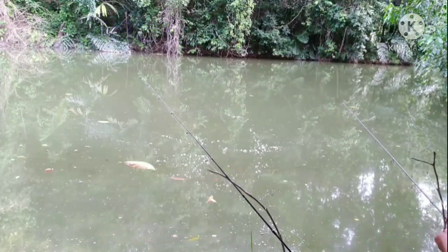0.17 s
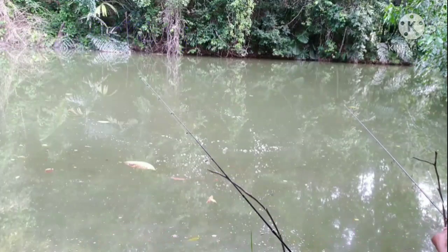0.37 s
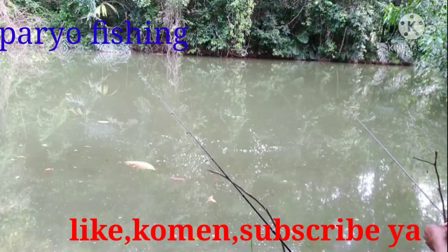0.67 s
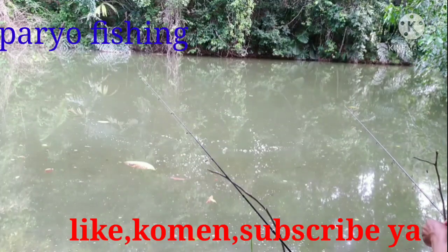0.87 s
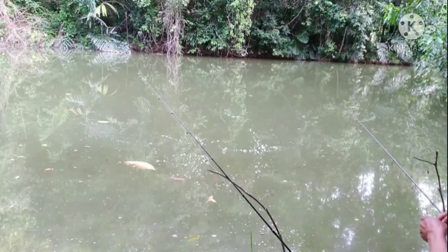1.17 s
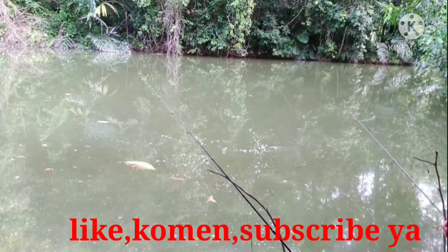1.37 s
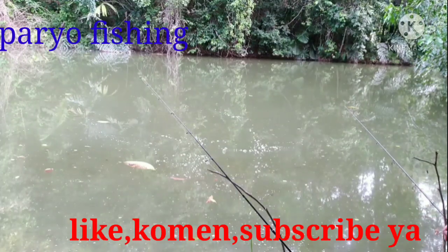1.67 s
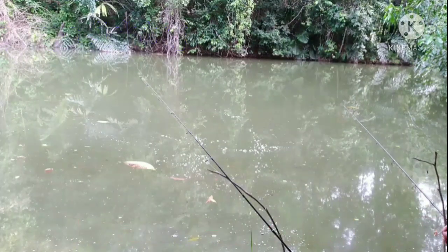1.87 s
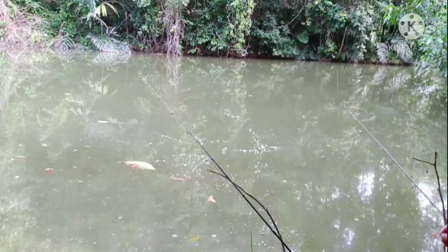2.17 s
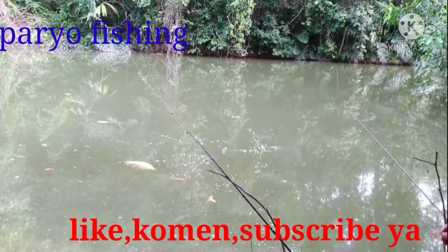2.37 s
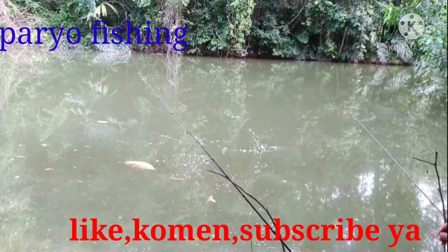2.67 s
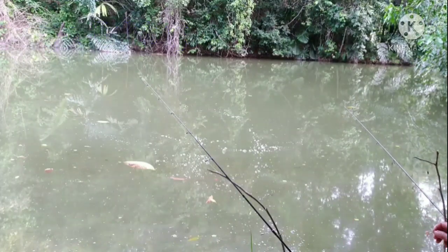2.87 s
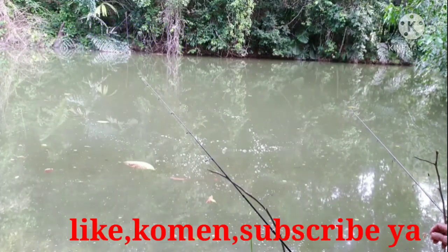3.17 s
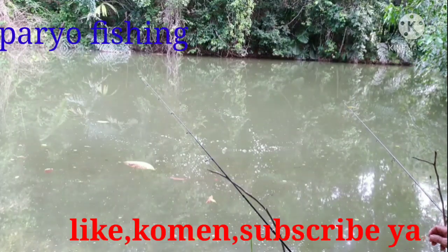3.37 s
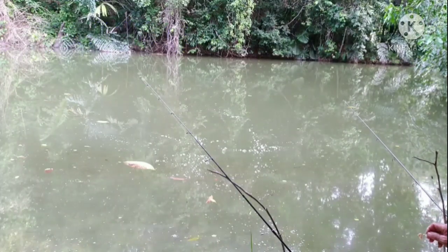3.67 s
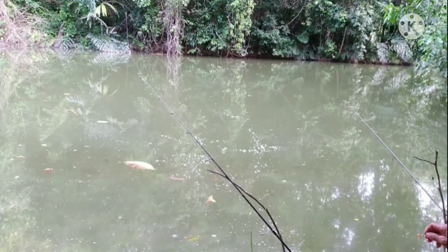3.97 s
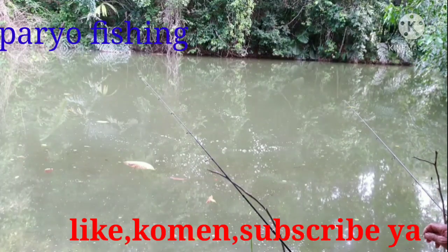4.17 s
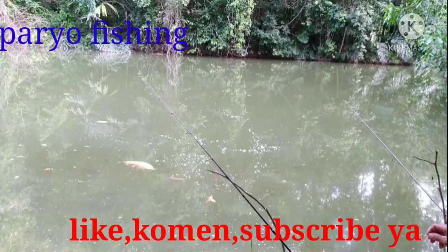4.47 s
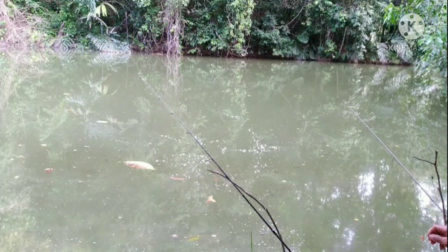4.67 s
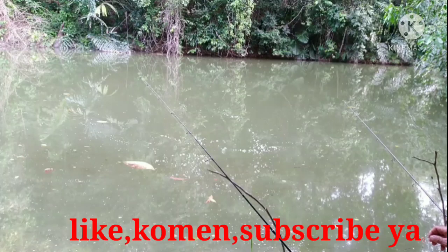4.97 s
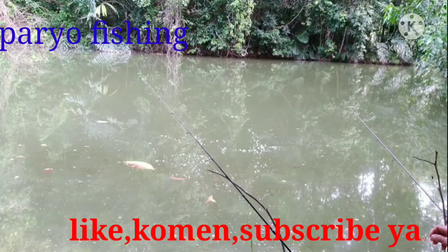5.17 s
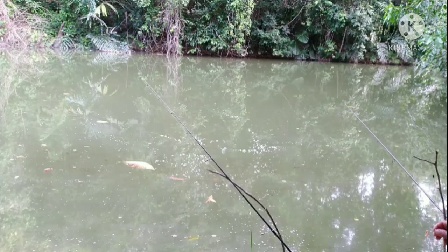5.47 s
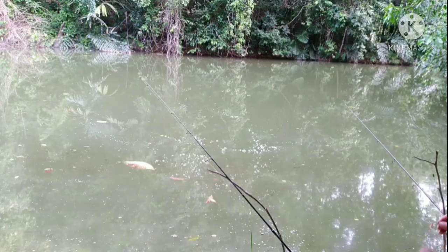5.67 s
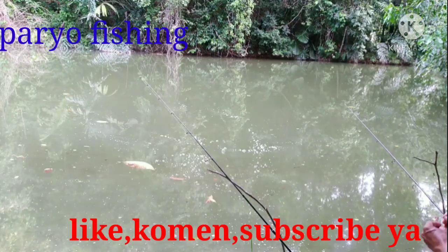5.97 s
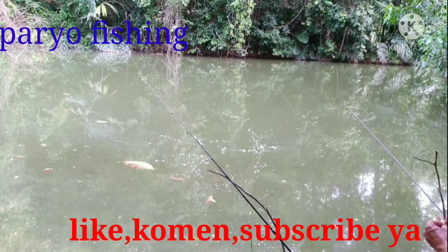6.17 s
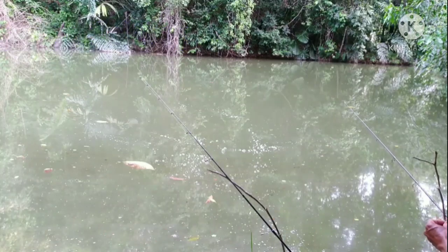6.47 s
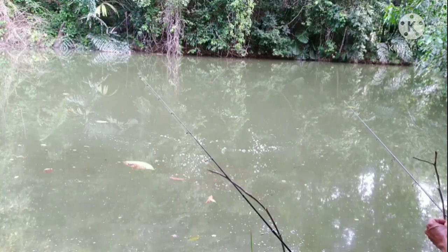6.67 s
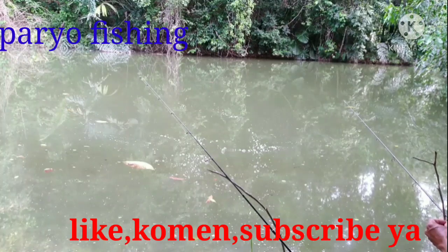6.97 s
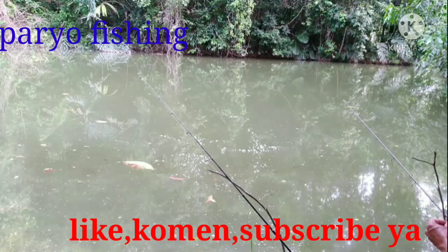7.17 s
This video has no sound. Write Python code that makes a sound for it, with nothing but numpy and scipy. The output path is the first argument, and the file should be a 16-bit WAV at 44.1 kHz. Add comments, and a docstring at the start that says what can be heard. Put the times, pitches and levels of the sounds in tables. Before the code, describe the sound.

From start to finish, high insects buzz on both sides, a dense dry shimmer around 7 to 9 kHz, fading very slightly, over faint fluttering hiss, low air rumble and a barely audible wavering hum. A tiny rustle comes at 0.1 s. At 0.8 s a rod knocks something hollow: a quick double clack, tiny bounces and a short scrape. The loudest rustle bursts at 1.4 s, slightly left, with sharp twig snaps until 1.5 s and more around 1.8 s. Lighter cloth and leaf movements continue irregularly to about 5 s, with crackles near 3.4 and 4.2 s and a soft low thud at 4.7 s. Brief arched bird chips sound around 1.4, 2.4, 2.7, 3.3, 4.6 and 4.8 s, then a fainter, more distant series from 5.2 to 5.7 s. A last gentle rustle at 5.5 s settles; faint chips remain near 6.3, 6.5 and 7.2 s.

```python
"""Insects buzz all around from the start, over a far hiss, a low rumble and a faint drone, on a forest pond bank.
Soon cloth and leaves rustle and snap on the left, a rod knocks, a small bird chips, and a soft thud follows late.
Trains of clicks excite narrow resonances for the insects; shaped noise gives hiss, rumble, drone, leaves and thud;
modal resonance gives the knocks, gliding sines the bird, damped sines the snaps. Two spaced microphones hear it."""
import sys
import numpy as np
from scipy import signal
from scipy.fft import rfft, irfft
from scipy.io import wavfile
from scipy.ndimage import uniform_filter1d

SR = 44100
rng = np.random.default_rng(int(sys.argv[2]) if len(sys.argv) > 2 else 0)


def wav_record(signal):
    """Record a signal, one row per channel, as 16-bit PCM in the file named by sys.argv[1]."""
    frames = np.transpose(np.atleast_2d(signal))
    bounded = np.clip(frames, -1, 1)
    # unit amplitude maps onto the largest positive 16-bit level
    quanta = np.round(bounded * 32767).astype(np.int16)
    wavfile.write(sys.argv[1], SR, quanta)


N = 321930
NEAR_LAG, FAR_LAG, KNOCK_LAG = 10, -14, 12  # samples by which the right port hears later (negative: earlier)


def undb(db):
    """Decibel definition: amplitude ratio of a level in dB."""
    return 10 ** (np.asarray(db) / 20)


def level(x, db):
    """Root-mean-square level: x is brought to db."""
    return x * undb(db) / np.sqrt(np.mean(x ** 2))


def along(points, hz):
    """Logarithmic frequency scale: a table of (f/Hz, value) is interpolated on it."""
    f, v = np.transpose(points)
    return np.interp(np.log(hz + 0.13), np.log(f), v)


def colour(x, points):
    """Linear filtering: the spectrum of x is weighted by (f/Hz, level/dB) points."""
    gain = undb(along(points, np.fft.rfftfreq(N, 1 / SR)))
    return irfft(rfft(x) * gain, N)


def ring(x, hz, width_hz):
    """Simple resonance: one peak with gain 1 at its centre."""
    return signal.lfilter(*signal.iirpeak(hz, hz / width_hz, fs=SR), x)


def walk(rate):
    """Random modulation: levels held 1 / rate s and smoothed twice, with a spread near 1."""
    k = int(SR / rate)
    steps = np.repeat(rng.standard_normal(N // k + 1), k)
    return 1.3 * uniform_filter1d(uniform_filter1d(steps, k), k)[:N]


def pan(pan_db):
    """Interaural level difference: gains of the left and right ports, pan_db apart."""
    return undb([[pan_db / 2], [-pan_db / 2]])


def ports(x, lag, pan_db):
    """Time and level difference: one source at both microphones."""
    return np.array([x, np.roll(x, lag)]) * pan(pan_db)


# kinds of insect: body f/Hz, spread of f among singers/Hz, ring t60/s, click rate/(1/s),
# level before the fade/dB, left minus right/dB
INSECT_KINDS = [(9420, 190, 0.0037, 182, -52.5, -2), (7770, 190, 0.0055, 130, -59.5, 7.5),
                (7180, 35, 0.04, 74, -64.5, -2)]
CHORUS_FADE_DB_PER_S = -0.09


def insects(count=20):
    """Impulse excitation of a resonator: each singer clicks its body at its own pace."""
    out = np.zeros((2, N))
    for hz, spread_hz, t60, rate, db, pan_db in INSECT_KINDS:
        width_hz = np.log(1000) / np.pi / t60
        for side in range(2):  # each port hears other singers, the right ones a little higher
            kind = 0
            for pitch, pace, near in rng.standard_normal((count, 3)):
                gaps = SR / (rate * (1 + .04 * pace)) * (1 + .06 * rng.standard_normal(N // 100))
                at = np.cumsum(gaps).astype(int)
                strength = undb(1.2 * near + 1.9 * rng.standard_normal(len(at)))
                clicks = np.zeros(N)
                clicks[at[at < N]] = strength[at < N]
                body_hz = hz + spread_hz * (pitch + 0.27 * (side - .5))
                kind = kind + ring(clicks, body_hz, width_hz)
            out[side] += level(kind * undb(.7 * walk(22)), db + pan_db * (.5 - side))
    return out * undb(CHORUS_FADE_DB_PER_S * np.arange(N) / SR)


# spectrum of the far hiss: f/Hz, relative density level/dB per Hz
HISS_SPECTRUM = [(88, -32), (150, -12), (388, -4), (428, -12), (471, -7), (561, -6.5), (966, -12.5),
                 (2500, -3.5), (5540, -10), (7270, -15), (9180, -2.5), (10900, -35), (15500, -16)]
# likeness of the hiss at left and right: f/Hz, shared part of the power/(0-1)
HISS_LIKENESS = [(150, 0.98), (450, 0.32), (1200, 0.69), (2500, 0), (4000, 0.06), (15000, 0)]
HISS_DB, HISS_FADE_DB_PER_S = -52.5, -0.0654  # level before the fade


def hiss():
    """Partial coherence: a shared part, mostly low, from the right, and unrelated noise at each port."""
    hz = np.fft.rfftfreq(N, 1 / SR)
    shared = np.clip(along(HISS_LIKENESS, hz), 0, 1)
    far = rfft(ports(rng.standard_normal(N), FAR_LAG, 0))
    unrelated = rfft(rng.standard_normal((2, N)))
    field = (np.sqrt(shared) * far + np.sqrt(1 - shared) * unrelated) * undb(along(HISS_SPECTRUM, hz))
    out, swell = 0, walk(6.2)
    # overlapping bands, half an octave apart, swell together and flicker alone
    for octave in np.arange(6, 15, .5):
        band = np.cos(np.pi * np.clip(np.log2(hz + 1) - octave, -.5, .5)) ** 2
        flicker = .7 * walk(12) + .8 * walk(25)
        out = out + irfft(field * band, N) * undb(.5 * swell + flicker)
    return level(out, HISS_DB + HISS_FADE_DB_PER_S * np.arange(N) / SR)


# spectrum of air moving on the ports: f/Hz, relative density level/dB per Hz
RUMBLE_SPECTRUM = [(1.8, -33), (3.0, 13.5), (16, 0), (87, -14.5), (173, -21), (250, -24.5), (320, -29),
                   (550, -120)]
RUMBLE_DB, RUMBLE_PAN_DB = -45.5, -2


def rumble():
    """Incoherent flow noise: air moving on the two ports, unrelated between them."""
    air = colour(rng.standard_normal((2, N)), RUMBLE_SPECTRUM)
    return level(air, RUMBLE_DB) * pan(RUMBLE_PAN_DB)


DRONE_HZ, DRONE_WIDTH_HZ, DRONE_DB = 427.7, 37, -68.5  # width of each of two resonances in series


def drone():
    """Narrow-band noise: two resonances in series give a wavering hum from far ahead."""
    hum = ring(ring(rng.standard_normal(N), DRONE_HZ, DRONE_WIDTH_HZ), DRONE_HZ, DRONE_WIDTH_HZ)
    return ports(level(hum * undb(walk(6)), DRONE_DB), 0, 0)


RISE_DB = 20  # the level climbs this far during the rise


def stroke(t, rise, hold, db, t60):
    """Exponential decay of energy: the power of one movement rises, holds, then dies away."""
    rising_db = RISE_DB * np.minimum(t / max(rise, .002) - 1, 0)
    dying_db = -60 * np.maximum(t - rise - hold, 0) / t60
    return (t > 0) * undb(2 * (db + rising_db + dying_db))


# movements on the bank: start t/s, rise/s, hold/s, rustle level/dB, crisp treble level/dB, dull brush level/dB
MOVEMENTS = [(0.13, 0.028, .04, -59.5, -72, -80), (1.4, 0.014, 0.11, -42.5, -43.5, -51),
             (1.547, .02, 0.078, -51.5, -55, -62), (1.737, 0.034, 0.08, -58.5, -53, -62),
             (2.066, 0.032, 0.065, -55.5, -59, -65.5), (2.254, 0.018, 0.023, -65, -71, -60.5),
             (2.563, 0.027, 0.14, -55.5, -56, -64.5), (2.9, 0.015, 0.023, -60, -67, -69),
             (3.102, 0.033, 0.2, -61, -63, -72), (3.343, 0.031, 0.097, -55, -57.5, -78),
             (3.567, 0.032, 0.11, -59.5, -64, -74), (3.704, 0.031, 0.04, -54.5, -59, -62),
             (3.897, 0.027, .04, -64, -71, -68), (4.144, 0.022, .03, -59.5, -58, -63),
             (4.214, 0.046, 0.055, -50.5, -57, -55.5), (4.455, 0.018, 0.023, -77, -68, -65),
             (4.695, 0.0098, 0.014, -64, -66, -57), (4.81, 0.02, 0.036, -62, -60, -65),
             (4.976, 0.033, 0.071, -56.5, -64, -67), (5.495, 0.055, 0.19, -59.5, -65, -80)]
# spectra of rustle, crisp treble and dull brush: f/Hz, relative density level/dB per Hz
RUSTLE_SPECTRUM = [(290, -30), (500, -10), (700, -7), (1180, -8.5), (1600, -8), (2200, -2.5), (3570, -0.5),
                   (5200, -3.5), (6200, -6.5), (6900, -7.5), (9000, -15), (15400, -52)]
CRISP_SPECTRUM = [(4000, -49), (6600, -13.5), (8930, 4), (11400, -11), (14500, -18), (15400, -26)]
BRUSH_SPECTRUM = [(120, -29), (200, 3), (350, 4), (600, -1), (1200, -27), (2000, -59)]
RUSTLE_T60_S, CRISP_T60_S, BRUSH_T60_S = 0.25, 0.67, 0.3
SETTLE_DB, SETTLE_T60_S = -6.5, 2.8  # leaves spring back after each movement
CRISP_HOLD = 0.56  # the treble holds for this share of the hold
GRAIN_DB, CLUMP_DB = 1.71, 1.34  # unevenness of single grains and of clumps


def moves():
    """Granular friction noise: cloth and leaves, part straight from the left, part scattered."""
    t = np.arange(N) / SR
    grain = rng.exponential(size=N // 16 + 1).repeat(16)[:N]
    grains = rng.standard_normal((3, N)) * undb(GRAIN_DB * grain + 1.1 * walk(40) + CLUMP_DB * walk(200))
    leaves = ports(grains[0], NEAR_LAG, 1.7) + 1.27 * grains[1:]
    dull = rng.standard_normal((3, N))
    cloth = ports(dull[0], NEAR_LAG, 0.21) + 0.37 * dull[1:]
    rustle, crisp, brush = np.zeros((3, N))  # powers
    for s, rise, hold, rustle_db, crisp_db, brush_db in MOVEMENTS:
        rustle += stroke(t - s, rise, hold, rustle_db, RUSTLE_T60_S)
        rustle += stroke(t - s, rise, hold, rustle_db + SETTLE_DB, SETTLE_T60_S)
        crisp += stroke(t - s, rise, CRISP_HOLD * hold, crisp_db, CRISP_T60_S)
        brush += stroke(t - s, rise, hold, brush_db, BRUSH_T60_S)
    out = level(colour(leaves, RUSTLE_SPECTRUM), 0) * np.sqrt(rustle)
    out += level(colour(leaves, CRISP_SPECTRUM), 0) * np.sqrt(crisp)
    return out + level(colour(cloth, BRUSH_SPECTRUM), 0) * np.sqrt(brush)


# contacts of the rod with something hollow: t/s, blow force level/dB, scrape force level before its fade/dB,
# scrape length/s, low-pass corner f of the scrape/Hz
CONTACTS = [(.779, -21.5, -56, 0.011, 5000), (0.7843, -23, -50, 0.052, 2600), (.7905, -29, -70, .005, 2000),
            (.7955, -29, -70, .005, 2000), (.801, -30, -70, .005, 2000), (.8075, -30, -70, .005, 2000),
            (0.8755, -35, -59, 0.044, 2400)]
# modes of the hollow thing: f/Hz, relative level/dB, t60/s
HOLLOW_MODES = [(394, -18.5, 0.14), (570, -14, 0.045), (830, -20, 0.025), (975, -22, .05),
                (1037, -20, 0.07), (1340, -21, 0.03), (1640, -19, .035), (1850, -12, 0.025),
                (2170, -12, .03), (2290, -10, 0.035), (2650, -8, 0.022), (3020, -15, 0.012),
                (3480, -11, 0.01), (4040, -19, 0.0089), (4550, -19, 0.008)]
RASP_DB, RASP_HZ, RASP_WIDTH_HZ = -8, 2300, 1800  # the contact itself rasps
SLIP_DB = 1.8  # unevenness of the slips
BANK_T60_S, BANK_DB, BANK_HZ = .03, -2, 800  # ground and plants close by scatter the knock above this pitch


def knocks():
    """Modal superposition: blows, bounces and a fading, uneven scrape drive the same modes, and rasp."""
    force, t = np.zeros(N), np.arange(SR // 4) / SR
    for s, blow_db, scrape_db, length, hz in CONTACTS:
        at = int(s * SR)
        force[at] -= undb(blow_db)
        slips = rng.standard_normal(len(t)) * undb(SLIP_DB * walk(370)[:len(t)])
        scrape = signal.lfilter(*signal.butter(1, hz, fs=SR), slips)
        fade = undb(-6.5 * t / length - 11 * (t / length) ** 6)
        force[at:at + len(t)] += level(scrape, scrape_db) * fade
    body = sum(undb(db - 60 * t / t60) * np.sin(2 * np.pi * f * t) for f, db, t60 in HOLLOW_MODES)
    # a small body sends out no bass
    body = signal.sosfilt(signal.butter(6, 370, "highpass", fs=SR, output="sos"), body) / 4
    rasp = undb(RASP_DB) * ring(ring(force, RASP_HZ, RASP_WIDTH_HZ), RASP_HZ, RASP_WIDTH_HZ)
    knock = signal.fftconvolve(force, body)[:N] + rasp
    bank = rng.standard_normal((2, len(t))) * undb(-60 * t / BANK_T60_S)
    bank = signal.lfilter(*signal.butter(2, BANK_HZ, "highpass", fs=SR), bank)
    bank = level(bank, BANK_DB) / np.sqrt(len(t))
    return ports(knock, KNOCK_LAG, 0.3) + signal.fftconvolve(knock[None], bank, axes=1)[:, :N]


# bird chips, each an arch of pitch: t of the top/s, top f/Hz, foot f/Hz, length/s,
# straight level/dB, scattered level/dB, left minus right/dB
BIRD_CHIPS = [(0.931, 6800, 5270, .1, -75, -65, -4), (1.395, 7600, 6900, 0.044, -57, -57, 1.5),
              (2.398, 7600, 6300, 0.053, -60, -52, -1), (2.744, 7550, 5700, 0.059, -55.5, -53, 3.),
              (3.318, 7550, 5750, 0.053, -50, -53, 1), (4.575, 7400, 5800, 0.059, -56, -52, -1),
              (4.758, 7500, 6000, 0.05, -53.5, -53, 1), (5.248, 6200, 5840, 0.042, -72, -63, 4),
              (5.372, 6270, 5670, 0.034, -72, -64, 2.), (5.45, 7300, 5900, 0.078, -65, -57, 2),
              (5.53, 7150, 5700, 0.088, -75, -59, 3), (5.627, 7350, 6000, 0.064, -72, -60, 2),
              (5.708, 7280, 6000, 0.073, -75, -61, 0), (6.298, 7230, 5900, 0.079, -74, -59, 1),
              (6.472, 7250, 5900, .06, -75, -62, -2), (6.54, 7300, 6400, .05, -75, -60, -1),
              (7.24, 7100, 5800, 0.054, -70, -60, 0)]
CHIP_FADE_DB, CHIP_FOOT_DB = -3, -5  # the whistle fades, and is weaker at its feet than at its top
WOBBLE_HZ, FLUTTER_DB = 55, 3  # unsteadiness of pitch and level
TREES_T60_S, TREES_RISE_S = .24, .004  # scattered sound builds up within a few milliseconds, then dies away
ECHO_S, ECHO_DB = .027, -12  # one strong return from across the water


def bird():
    """Frequency modulation and scattering: arched whistles, each spread by leaves and trunks in its own way."""
    out, t = np.zeros((2, N + SR)), np.arange(SR // 2) / SR
    for s, top_hz, foot_hz, length, straight_db, scattered_db, pan_db in BIRD_CHIPS:
        u = np.clip(t * 2 / length - 1, -1, 1)  # -1 and 1 at the feet, 0 at the top
        hz = top_hz - (top_hz - foot_hz) * u ** 2 + WOBBLE_HZ * walk(500)[:len(t)]
        shape_db = CHIP_FADE_DB * u + CHIP_FOOT_DB * u ** 2 + FLUTTER_DB * walk(250)[:len(t)]
        tone = np.sin(2 * np.pi * np.cumsum(hz) / SR) * np.sqrt(2)
        whistle = tone * (1 - u ** 4) * undb(shape_db)
        trees = rng.standard_normal((2, len(t))) * undb(-60 * t / TREES_T60_S)
        trees = level(trees * (1 - np.exp(-t / TREES_RISE_S)), scattered_db) / np.sqrt(len(t))
        scattered = signal.fftconvolve(whistle[None], trees, axes=1)[:, :len(t)]
        at = int((s - length / 2) * SR)
        out[:, at:at + len(t)] += (whistle * undb(straight_db) + scattered) * pan(pan_db)
    echo = undb(ECHO_DB) * np.roll(out, int(ECHO_S * SR), axis=1)
    return (out + echo)[:, :N]


# twigs and dry leaves that snap: t/s, level of the snap/dB, ring f/Hz
TWIG_SNAPS = [(1.4126, -44, 4050), (1.425, -40, 3230), (1.431, -34, 5200), (1.4623, -34, 3480),
              (1.466, -32, 5600), (1.483, -40, 5000), (1.498, -40, 4500), (1.524, -41, 3300),
              (1.7623, -34, 3800), (1.809, -37, 3600), (1.8587, -42, 3930), (2.0827, -46, 4000),
              (3.3952, -44, 3150), (3.425, -38, 4100), (3.445, -38, 4570), (4.1503, -44, 4340),
              (4.258, -42, 4270), (4.4664, -52, 3260), (4.8419, -41, 3130)]
SNAP_RING_S, SNAP_TICK = .0007, .4  # ring time constant; strength of the broad tick at its start


def snaps():
    """Impulsive release: a one-sample tick and a damped sine of a few cycles."""
    out, t = np.zeros(N), np.arange(SR // 100) / SR
    for s, db, hz in TWIG_SNAPS:
        at = int(s * SR)
        damped = 1.03 * np.sin(2 * np.pi * hz * t) * np.exp(-t / SNAP_RING_S)
        out[at:at + len(t)] += undb(db) * (damped + SNAP_TICK * (t == 0))
    return ports(out, NEAR_LAG, 2.5)


# something soft is set down; the length runs from the peak to 1/e of it
THUD_S, THUD_DB, THUD_HZ, THUD_WIDTH_HZ, THUD_LENGTH_S = 4.72, -52, 266, 100, 0.018


def thud():
    """Damped resonance: noise through a low, broad peak, under a short Gaussian swell."""
    t = np.arange(N) / SR
    body = ring(ring(rng.standard_normal(N), THUD_HZ, THUD_WIDTH_HZ), THUD_HZ, THUD_WIDTH_HZ)
    push = np.exp(-((t - THUD_S) / THUD_LENGTH_S) ** 2)
    return ports(level(body, THUD_DB) * push, NEAR_LAG, 0)


def scene():
    """Linear superposition: all sources add at the two microphones."""
    return insects() + hiss() + rumble() + drone() + moves() + knocks() + bird() + snaps() + thud()


TOP_HZ = 15500


def record(dry):
    """Band limitation: a steep low-pass filter cuts the top."""
    return signal.sosfilt(signal.ellip(16, .5, 60, TOP_HZ, fs=SR, output="sos"), dry)


dry = scene()
out = record(dry)
wav_record(out)
```